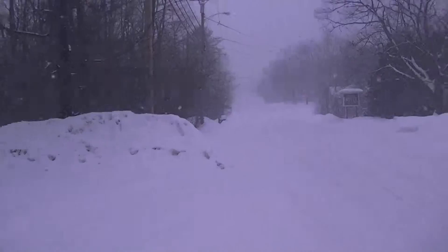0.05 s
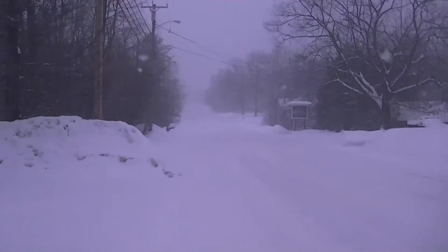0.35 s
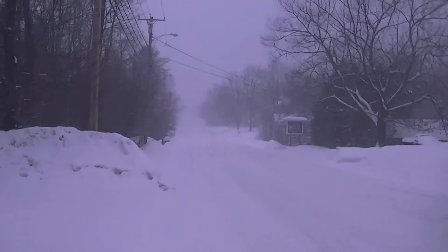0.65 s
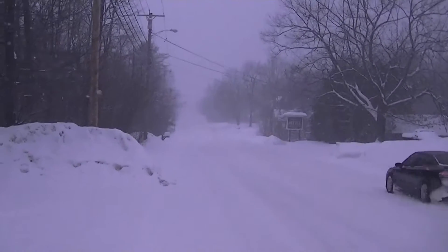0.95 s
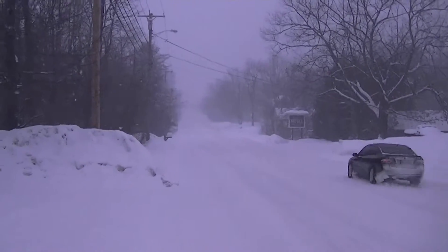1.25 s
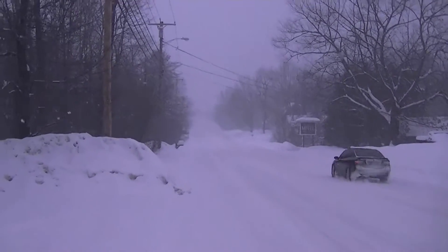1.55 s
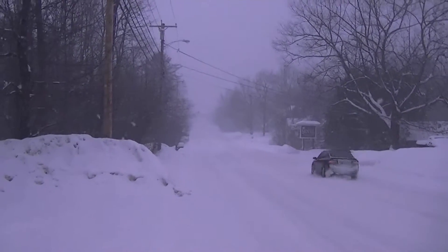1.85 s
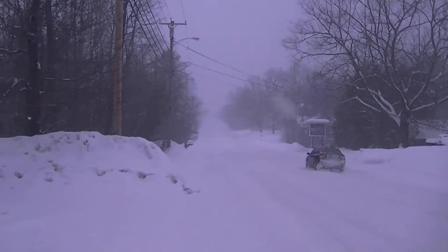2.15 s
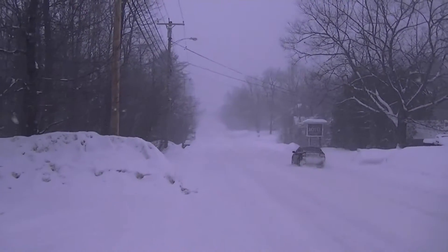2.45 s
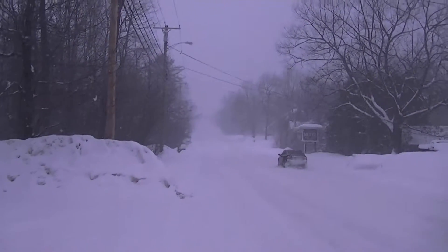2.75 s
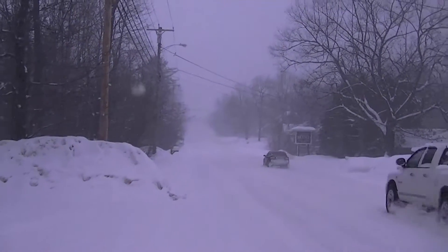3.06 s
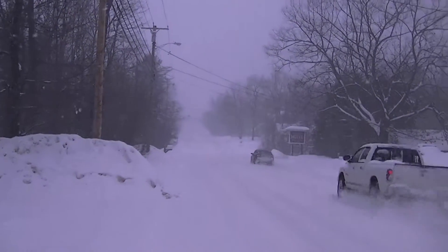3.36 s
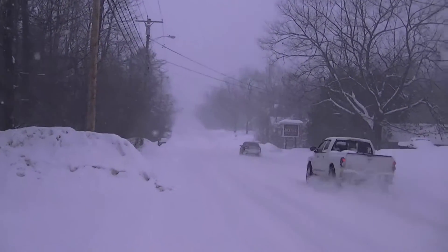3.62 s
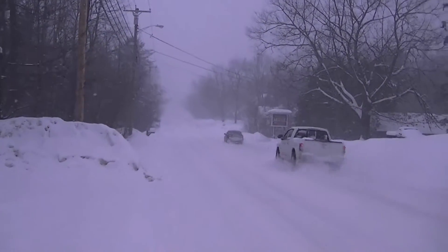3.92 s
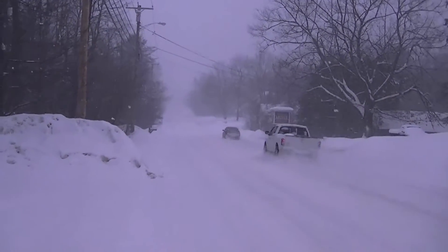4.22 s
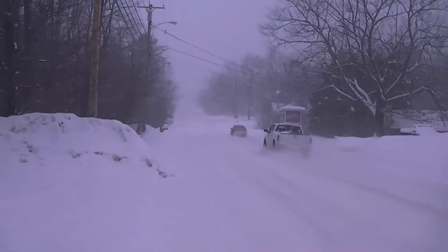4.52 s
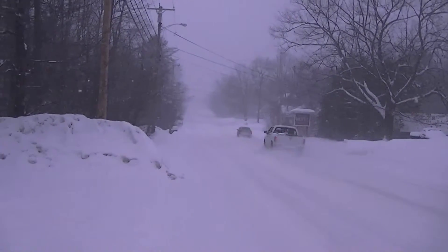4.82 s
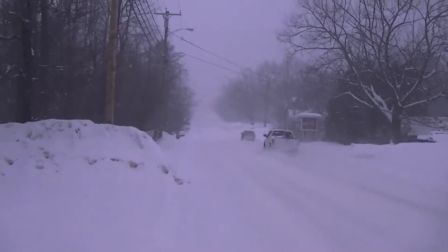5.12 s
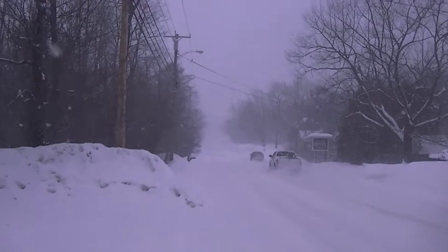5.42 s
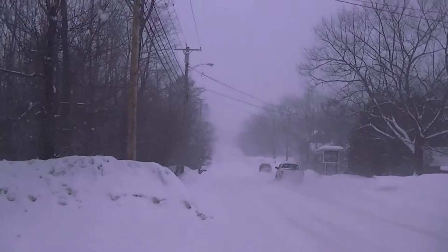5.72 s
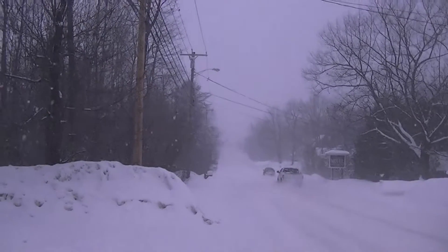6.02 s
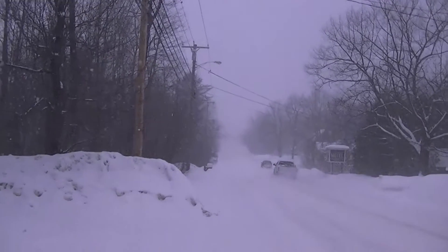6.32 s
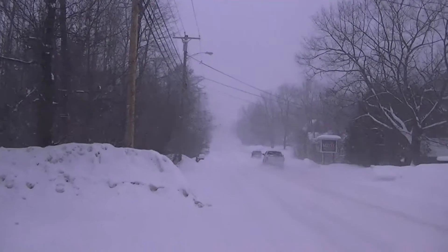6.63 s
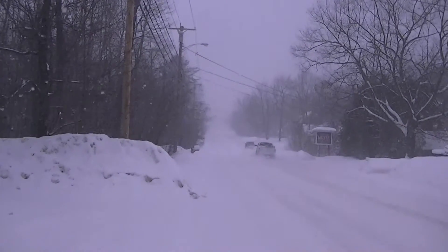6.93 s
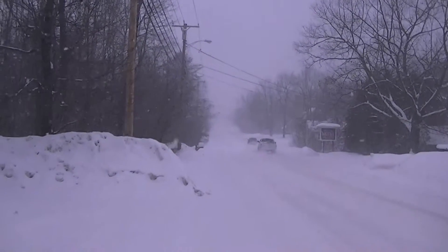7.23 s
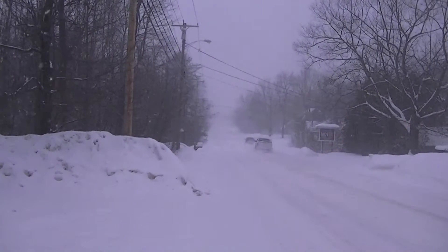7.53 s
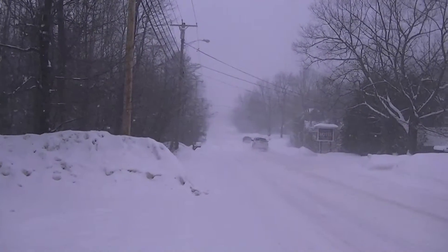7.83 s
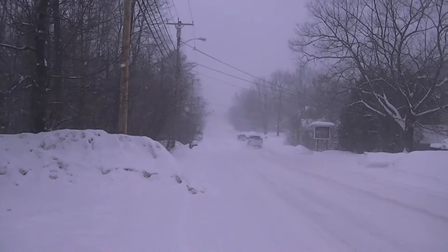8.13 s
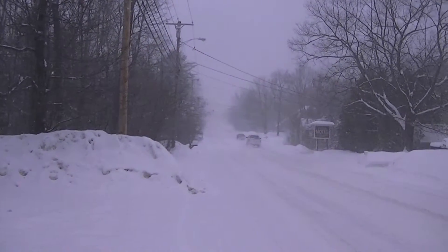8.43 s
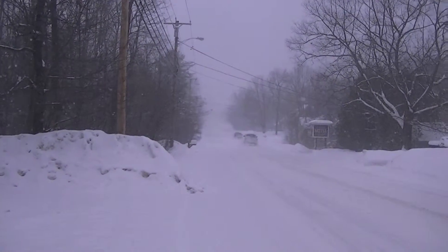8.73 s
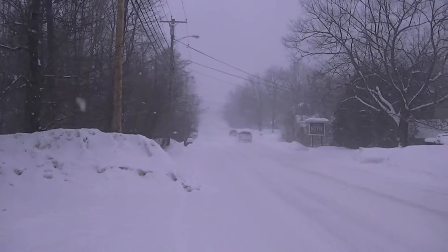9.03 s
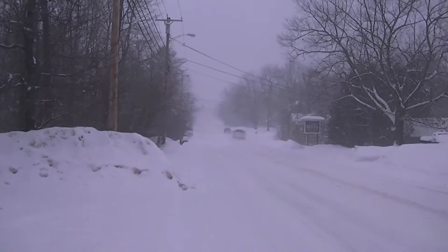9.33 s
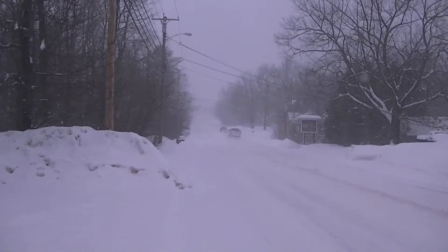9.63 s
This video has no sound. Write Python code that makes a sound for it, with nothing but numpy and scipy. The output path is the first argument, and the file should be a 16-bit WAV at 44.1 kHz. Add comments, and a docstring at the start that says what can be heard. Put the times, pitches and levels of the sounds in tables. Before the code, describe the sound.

A car is already passing on a snowy road, slightly to the right, its tyres roaring away with a hollow swish and a hiss of powder. Just before 2 seconds a heavy flake slaps the microphone sharply on the left, and a tyre knocks. A pickup passes close between 2 and 3 seconds, with a swelling tyre roar, bright spray and a throbbing engine hum that drops in pitch. From about 2.5 to 5 seconds its exhaust chirps in thin bouts, joined early on by a faint squeak of snow. The engine sags around 5 seconds, then climbs near 7 as the pickup pulls away and fades, with fainter chirps. Wind rushes in the trees throughout, gusting around 6 to 7 seconds and rising to a brief hollow howl at 9. Icy flakes tick lightly on the microphone, with heavier taps near 6 and 8 seconds.

```python
"""Two vehicles on a snowy road.

A car, then a V8 pickup, pass close by and drive off into a snowstorm. Tyres roar on packed snow
and throw up powder. The pickup's note drops as it passes, sags as it coasts and climbs as it
pulls away, while a small exhaust leak chirps in bouts. Wind gusts in the trees, and icy flakes
strike the microphone's two openings, its left and right ports."""
import sys
import numpy as np
from scipy import signal
from scipy.fft import rfft, irfft, next_fast_len
from scipy.io import wavfile

SR = 44100
rng = np.random.default_rng(int(sys.argv[2]) if len(sys.argv) > 2 else 0)


def store_pcm(level_fs):
    """Save levels as 16-bit WAV."""
    pcm = np.round(np.clip(level_fs, -1, 1) * 32767).astype(np.int16)
    wavfile.write(sys.argv[1], SR, np.atleast_2d(pcm).T)


N = 426447
T = np.arange(N) / SR

# how each vehicle drives past: closest_at_s, speed_m_per_s, closest_m
CAR_PASS = (-0.51, 9.95, 4.08)
PICKUP_PASS = (2.43, 13.5, 4)
# where the traffic is heard from: time_s, left_minus_right_db, left_lag_samples
DIRECTION = [(0, -4.5, 4.2), (.5, -3.5, 2.7), (1.1, -2, 1.2), (1.5, -3, 2), (2.1, -4, 4.5), (2.7, -4, 3),
             (3.3, -1.5, 1.6), (4.5, -0.7, 0.56), (9.6, -0.6, 0.85)]
# how each tyre sound travels (levels are sideways at 10 m, before the snow soaks any up):
# car_db, pickup_db, extra_ahead_db, extra_behind_db, snow_loss_db_per_m, beam_tightness
ROAR_TRAVEL = (-47, -44.5, 14.5, 15.5, 0.25, 2.5)
DRONE_TRAVEL = (-46, -48, 19.5, 20.5, 0.16, 4)
RUSH_TRAVEL = (-44, -45.5, 14.5, 10, 0.33, 2.5)
SPRAY_TRAVEL = (-69.5, -60.5, 16.5, 19, 0.26, 3.5)

# the tone colour of each noise, from bass to treble: pitch_hz, level_db
ROAR_COLOUR = [(25, -62), (45, -25), (80, -18.5), (150, -9.5), (280, 1), (440, 1), (660, 0), (850, -7.5),
               (1300, -24), (2500, -23)]
CAR_DRONE_COLOUR = [(170, -37), (280, -7.5), (360, -13.5), (445, -1.5), (490, -4), (540, -11), (750, -17.5)]
PICKUP_DRONE_COLOUR = [(250, -38), (370, -5.5), (430, -8), (490, -3), (560, -5.5), (800, -23)]
RUSH_COLOUR = [(350, -26), (650, 3), (900, 1.5), (1300, 0), (1750, -5), (2300, -8.5), (3000, -23.5),
               (4200, -37), (7000, -55)]
SPRAY_COLOUR = [(1500, 6), (3000, 11), (4000, 6), (5300, 2), (7500, 2), (10500, 1), (12500, -5.5),
                (15000, -8.5), (16500, -33)]
POWDER_COLOUR = [(1800, 12), (3600, 5.5), (4500, 4.5), (7500, 2), (11000, 2), (15000, -11)]
SWISH_COLOUR = [(450, -26), (750, 5.5), (1050, 2), (1280, 2.5), (1550, -2.5), (2400, -18.5)]
BURBLE_COLOUR = [(180, -28), (285, 2), (400, 10.5), (480, 0.5), (580, -12), (800, -3), (1200, -25)]
LOOSE_SNOW_COLOUR = [(700, -16), (1400, 5.5), (1750, 1), (2200, 1), (3000, -5), (4000, -13.5), (6000, -23),
                     (12000, -35)]
# how alike left and right are (1 = the same), for most noises and for close ones: pitch_hz, likeness
USUAL_LIKENESS = [(100, 0.63), (250, 0.87), (500, 1), (1000, 0.71), (1500, 0.47), (2100, 0.59), (5000, 0.2),
                  (12000, 0.26)]
CLOSE_LIKENESS = [(8000, 0.88), (13000, 0.55)]
# the two ports ring differently: pitch_hz, left_minus_right_db
PORT_BALANCE = [(1350, -0.5), (1700, 3.5), (2200, 0), (3600, -2), (5000, 0), (10300, 5), (12700, -5),
                (16000, -3)]

# each vehicle flings powder at the microphone: start_s, length_s, level_db
POWDER_FLINGS = [(-0.1, 0.55, -50), (1.953, 0.99, -48.5)]
# a tyre knocks; the tyre roar swells broadly around that moment: time_s, knock_db, swell_db
TYRE_KNOCKS = [(1.995, -23, 6), (3.516, -29, 1.5), (4.693, -34, 3)]
# a tyre ploughs through loose snow: start_s, length_s, level_db, rise_s
LOOSE_SNOW_PATCHES = [(2.554, 0.37, -50, 0.3), (4.127, 0.18, -42.5, 0.059)]
# gusts of wind: peak_s, half_length_s, extra_db
GUSTS = [(5.85, 0.19, 3.5), (6.356, 0.26, 3.5), (6.936, 0.27, 2), (8.997, 0.5, 4)]
# a hollow swish: peak_s, half_length_s, level_db
SWISHES = [(0.353, 0.48, -33.5)]
# the wind howls: peak_s, rise_s, level_db
HOWLS = [(6.89, 0.11, -54), (9.0, 0.25, -46)]

# engine speed (in one cycle all eight cylinders fire once): time_s, cycles_per_s
ENGINE_SPEED = [(0, 13.26), (1.4, 13.58), (4.1, 13.52), (4.7, 13.59), (5.0, 12.79), (5.25, 12.17),
                (5.6, 12.1), (6.05, 12.48), (6.6, 13.56), (7.2, 14.82), (8.0, 14.99), (9.1, 15.04),
                (9.67, 14.8)]
COAST_PER_S, CRUISE_PER_S, PULL_PER_S = 12.1, 13.55, 14.9
# the whole engine hum grows louder and softer: time_s, gain_db
HUM_LOUDNESS = [(0, -4), (.6, -2), (1.5, -1.5), (1.88, 1), (2.2, 2.5), (2.6, -1.5), (3.1, 1.5), (4.7, -1.5),
                (5.9, -3), (6.55, -5), (7.3, -2.1), (9.0, -4.5), (9.67, -6)]
# the main engine tones; a tone's order is how many times it vibrates in one cycle:
# order, coasting_db, cruising_db, pulling_db, extra_approaching_db, extra_passing_db
FIRING_TONES = [(8, -80, -46.5, -49, 1.5, -3), (12, -60, -48, -42, 2.5, 10.5),
                (16, -41.5, -56.5, -89, -4, 20), (20, -53, -51.5, -53, 3.5, 14.5)]
# the eight exhaust pulses in firing order, used to set each tone's phase: strength
PULSE_STRENGTHS = [0.907, 0.27, 0.612, 0.768, 0.31, 0.821, 0.628, 0.34]
# the tones of the lope, the throb of uneven firing: order
LOPE_ORDERS = (4, 5, 7, 9, 10, 13, 14, 15, 17, 18, 19, 21, 22, 25, 26, 27, 28, 29, 32, 33)
# the share of each of those tones when cruising and when pulling: relative_db
LOPE_CRUISING_DB = (-22, -22, -7.5, -11.5, -11, 3.5, 0.5, 0, -10, -29, -0.5, -20, -6, -9.5, -13, -18, -19,
                    -3, -35, -11)
LOPE_PULLING_DB = (-25, -20, -6, -0.5, -1.5, -2, 1.5, -1, 4.5, -12, -14, -20, -7, -3.5, -6, -9, -2, -6.5,
                   -8, -4)
# base levels of the lope and of the tailpipe's burble: coasting_db, cruising_db, pulling_db
LOPE_DB = (-66, -50, -53.5)
BURBLE_DB = (-51.5, -52.5, -44)
# bouts of chirping from the exhaust leak: start_s, length_s, level_db, start_pitch_hz
LEAK_CHIRPS = [(2.449, 0.12, -42, 2800), (2.591, 0.26, -41, 2600), (2.949, 0.172, -46.5, 2550),
               (3.121, 0.15, -41.3, 2400), (3.291, 0.36, -43, 2700), (3.67, 0.24, -44.5, 2550),
               (3.965, 0.22, -48.5, 2950), (4.37, .36, -50, 2500), (4.728, 0.21, -54.5, 2550),
               (6.488, 0.023, -54, 2950), (6.779, 0.063, -54.5, 2850), (6.931, .4, -59.5, 3000),
               (7.37, 0.121, -56.5, 3000), (7.615, 0.053, -54.5, 2600), (7.758, .16, -57, 2600),
               (8.032, 0.66, -60.5, 2900), (8.655, 0.86, -58, 2350), (9.16, .03, -53, 2450),
               (9.267, 0.118, -52.5, 2284)]

# heavy flakes slap a port: time_s, slap_db, left_minus_right_db, thud_db
HEAVY_FLAKES = [(1.9348, -4.5, 31, -25), (6.1633, -33, -24, -26), (6.1632, -13, -22, -30),
                (7.9657, -21, -20, -26), (7.967, -24, -16, -31)]
# icy flakes shatter on a port: time_s, strike_db, left_minus_right_db, pitch_hz
ICY_FLAKES = [(3.1787, -35, 0.5, 11500), (3.5887, -35, 7, 10500), (3.8137, -32, -4, 12800),
              (5.1637, -35, 5, 12000), (5.3483, -31.5, 3, 9650), (5.5243, -36, 2, 9800),
              (6.3843, -30, -2, 10500), (6.511, -38, 1.5, 11080), (6.565, -34.5, -0.5, 9000),
              (6.895, -35, -12, 12430), (7.161, -34, 3, 9530), (7.7628, -35, 0.5, 11600),
              (9.0458, -37, 9, 10470), (9.1064, -27, 3, 12500)]


def from_db(db):
    """Turn decibels into a gain to multiply a sound by."""
    return 10 ** (np.asarray(db) / 20)


def rms_one(x):
    """Scale a signal so that its average power is 1."""
    return x / np.sqrt(np.mean(x ** 2) + 1e-20)


def in_time(rows):
    """Join a table's points with lines, giving each column a value at every sample."""
    times, *columns = np.transpose(rows)
    return [np.interp(T, times, column) for column in columns]


def per_bin(points):
    """Read a table of pitches at every frequency of the spectrum."""
    hz, value = np.transpose(points)
    return np.interp(np.log(np.arange(N // 2 + 1) * SR / N + 1), np.log(hz), value)


def drift(rate_hz):
    """A smooth random wobble, about 1 in size."""
    keep = np.exp(-80 * np.pi * rate_hz / SR)
    steps = rng.standard_normal(N // 40 + 2002)  # one for every 40 samples
    slow = signal.lfilter([1], [1, -2 * keep, keep * keep], steps)[2000:]
    return np.interp(np.arange(N) / 40, np.arange(len(slow)), rms_one(slow))


def swell(peak_s, half_length_s):
    """A smooth rise and fall, 1 at its peak."""
    return np.exp(-((T - peak_s) / half_length_s) ** 2)


def bout(start_s, length_s, db, rise_s, fade_s):
    """The loudness of one event: it rises, holds and fades."""
    since = np.maximum(T - start_s, 0)
    return from_db(db) * np.minimum(since / rise_s, 1) * np.exp(-np.maximum(since - length_s, 0) / fade_s)


def resonance(x, hz, width_hz):
    """Make a sound ring around one pitch; a narrower width rings longer."""
    keep = np.exp(-np.pi * width_hz / SR)
    feedback = [1, -2 * keep * np.cos(2 * np.pi * hz / SR), keep * keep]
    return signal.lfilter(np.array([1, 0, -1]) * (1 - keep * keep) / 2, feedback, x + 1e-18)


def noise(colour, likeness=USUAL_LIKENESS):
    """Stereo noise with a given tone colour, partly alike on the left and right."""
    shared, opposite = rfft(rng.standard_normal((2, N)))
    alike = np.clip(per_bin(likeness), -1, 1)
    pair = np.sqrt(1 + alike) * shared + np.sqrt(1 - alike) * opposite * [[1], [-1]]
    top_hz, top_db = colour[-1]
    faded_top = list(colour) + [(2 * top_hz, top_db - 40)]
    return rms_one(irfft(pair * from_db(per_bin(faded_top)), N))


def position(vehicle):
    """Distance in metres, and heading from -1 (coming straight on) to 1 (going straight away)."""
    closest_at_s, speed, closest_m = vehicle
    along = speed * (T - closest_at_s)
    distance = np.hypot(along, closest_m)
    return distance, along / distance


def carried(vehicle, db, ahead_db, behind_db, loss_db_per_m, tightness):
    """How much tyre sound arrives: it spreads out, beams along the road and is soaked up by snow."""
    distance, heading = position(vehicle)
    beam_db = np.where(heading < 0, ahead_db, behind_db) * np.abs(heading) ** tightness
    return from_db(db + beam_db - loss_db_per_m * distance) * 10 / distance


def passing(travel):
    """The loudness of a tyre sound that both vehicles make."""
    car_db, pickup_db, *beam = travel
    return np.hypot(carried(CAR_PASS, car_db, *beam), carried(PICKUP_PASS, pickup_db, *beam))


def drone():
    """The car's treads drone in a narrow, hollow band, the pickup's in a broader one."""
    car_db, pickup_db, *beam = DRONE_TRAVEL
    car = carried(CAR_PASS, car_db, *beam) * noise(CAR_DRONE_COLOUR)
    pickup = carried(PICKUP_PASS, pickup_db, *beam) * noise(PICKUP_DRONE_COLOUR)
    return car + pickup


def tyres(roar_flutter_db=0.97, rush_flutter_db=1.0):
    """Treads pack the snow with a roar that swells now and then; air rushes out and powder sprays."""
    swell_db = sum(db * swell(s, half_length_s=0.46) for s, _, db in TYRE_KNOCKS)
    tread = from_db(swell_db) * passing(ROAR_TRAVEL) * noise(ROAR_COLOUR) + drone()
    roar = from_db(roar_flutter_db * drift(4.3)) * tread
    rush = passing(RUSH_TRAVEL) * from_db(rush_flutter_db * drift(30)) * noise(RUSH_COLOUR)
    spray = passing(SPRAY_TRAVEL) * noise(SPRAY_COLOUR)
    return roar + rush + spray


def powder(flutter_db=1.34):
    """Flung powder hisses brightly from one close spot, then fades."""
    gain = sum(bout(*row, rise_s=0.041, fade_s=0.36) for row in POWDER_FLINGS)
    return gain * from_db(flutter_db * drift(21)) * noise(POWDER_COLOUR, CLOSE_LIKENESS)


def wind(rush_db=-51.5, hiss_db=-60.5, flutter_db=0.88, hiss_follows=0.32):
    """The storm rushes in the bare trees; blown snow hisses and follows the gusts a little."""
    gust_db = sum(db * swell(s, half_s) for s, half_s, db in GUSTS) + flutter_db * drift(17)
    rush = from_db(rush_db + gust_db) * noise(RUSH_COLOUR)
    hiss = from_db(hiss_db + hiss_follows * gust_db) * noise(SPRAY_COLOUR)
    return rush + hiss


def swish():
    """A hollow swish rises and falls."""
    return sum(from_db(db) * swell(s, half_s) for s, half_s, db in SWISHES) * noise(SWISH_COLOUR)


def by_load(coasting, cruising, pulling):
    """Blend three values as the engine slows down and speeds up."""
    speed, = in_time(ENGINE_SPEED)
    return np.interp(speed, [COAST_PER_S, CRUISE_PER_S, PULL_PER_S], [coasting, cruising, pulling])


def engine_hum(cycles, stumble_cycles=0.0017, rough_db_per_order=0.0815, lope_waver_db=1.0):
    """Exhaust pulses blend into a hum, which throbs as they are unequal and never quite on time."""
    distance, heading = position(PICKUP_PASS)
    approaching = np.maximum(-heading, 0)
    going_past = bout(start_s=1.96, length_s=0.755, db=0, rise_s=0.34, fade_s=0.32)
    pull = by_load(0, 0, 0.96)
    uneven_cycles = cycles + stumble_cycles * drift(23)
    far_lift_db = 0.05 * np.maximum(distance - 60, 0)
    pulse_places = np.arange(len(PULSE_STRENGTHS)) / len(PULSE_STRENGTHS)

    def tone(order, db):
        """One engine tone; high ones are rougher, gain a little far off and leave the pipe later."""
        pulses = np.sum(PULSE_STRENGTHS * np.exp(-2j * np.pi * order * pulse_places))
        pipe_lag = 0.0115 * order * order
        phase = 2 * np.pi * order * uneven_cycles + np.angle(pulses) - pipe_lag
        db = db + rough_db_per_order * order * drift(13) + (far_lift_db if order > 20 else 0)
        return np.sqrt(2) * from_db(db) * np.cos(phase)

    firing = sum(by_load(*from_db(load_db)) * tone(order, ahead_db * approaching + past_db * going_past)
                 for order, *load_db, ahead_db, past_db in FIRING_TONES)
    lope = sum(tone(order, cruising + pull * (pulling - cruising) + lope_waver_db * drift(1.9))
               for order, cruising, pulling in zip(LOPE_ORDERS, LOPE_CRUISING_DB, LOPE_PULLING_DB))
    tailpipe_in_view_db = 5 * swell(peak_s=2.82, half_length_s=0.69)
    lope = lope * by_load(*from_db(LOPE_DB)) * from_db(tailpipe_in_view_db)
    hum = from_db(in_time(HUM_LOUDNESS)[0]) * (firing + lope)
    # the hum reaches the left port a little later and weaker
    sides = np.array([[-1], [1]])
    shifted = signal.hilbert(hum, next_fast_len(N))[:N] * np.exp(0.11j * sides)
    return np.real(shifted) * from_db(0.3 * sides)


def burble(cycles, loss_db_per_m=0.6):
    """Rough gas puffs from the tailpipe, hardest when pulling; past 60 m the snow soaks it up."""
    puffs = np.exp(0.059 * np.cos(2 * np.pi * cycles) + 0.5 * np.cos(2 * np.pi * 4 * cycles))
    beyond_m = np.maximum(position(PICKUP_PASS)[0] - 60, 0)
    gain = by_load(*from_db(BURBLE_DB)) * from_db(-loss_db_per_m * beyond_m)
    return gain * rms_one(puffs) * noise(BURBLE_COLOUR)


def fine_snow(per_s=11, strike_db=-51, spread_db=4, crumble_s=0.0022):
    """Small flakes patter on each port at random and crumble."""
    lands = rng.random((2, N)) < per_s / SR
    hits = lands * from_db(strike_db + spread_db * np.clip(rng.standard_normal(N), -2, 2))
    fades = signal.lfilter([1], [1, -np.exp(-1 / (crumble_s * SR))], hits + 1e-18)
    ticks = fades * rng.standard_normal((2, N))
    return signal.sosfilt(signal.butter(2, [8500, 14500], "band", fs=SR, output="sos"), ticks)


def heavy_flakes(spike_s=0.000027, crumbs=0.1, scatter_s=0.001):
    """A heavy flake slaps one port and crumbles, with a short low thud, opposite on left and right."""
    out, t = np.zeros((2, N)), T[:SR // 100]
    port = signal.butter(1, [900, 13500], "band", fs=SR, output="sos")
    for s, db, pan_db, thud_db in HEAVY_FLAKES:
        slap = np.exp(-t / spike_s) + crumbs * rng.standard_normal((2, len(t))) * np.exp(-t / scatter_s)
        sides = from_db([[pan_db / 2], [-pan_db / 2]])
        at = int(s * SR)
        out[:, at:at + len(t)] += from_db(db) * signal.sosfilt(port, slap) * sides / sides.max()
        out += knocks([(s, thud_db)], hz=557, width_hz=310) * np.sign(pan_db) * np.array([[1], [-1]])
    return out


def knocks(events, hz, width_hz):
    """Soft blows, each given as time_s and level_db, ring briefly at one pitch."""
    hits = np.zeros(N)
    for s, db, *_ in events:
        hits[int(s * SR)] = from_db(db)
    return resonance(resonance(hits, hz, width_hz), hz, 2 * width_hz) * SR / (np.pi * width_hz)


def exhaust_leak(cycles, trim_db=-0.5, uneven_db=1.1, end_hz=2100, width_hz=215, seep=0.021, pure=0.69):
    """One bank of four cylinders spits gas; each spit whistles and falls as its cylinder empties."""
    spit, progress = np.divmod(cycles * 4, 1)  # progress runs from 0 to 1 in each spit
    chance = np.clip(rng.standard_normal((int(spit[-1]) + 1, 3)), -2, 2)
    size, sharpness, detune = chance[spit.astype(int)].T
    flow = from_db(uneven_db * size) * (seep + progress * np.exp(-progress / 0.16))
    start_hz, = in_time([(s + length / 2, hz) for s, length, _, hz in LEAK_CHIRPS])
    fall = np.exp(-progress / 0.23 + 0.2 * sharpness)
    hz = (end_hz + (start_hz - end_hz) * fall) * (1 + 0.02 * detune)
    roughness = noise([(10, 0), (width_hz, -5), (4 * width_hz, -27)])
    roughness += 0.7 * noise([(10, 0), (width_hz, -5)]) * [[1], [-1]]
    phase = 2 * np.pi * np.cumsum(hz) / SR
    tones = np.sin(phase) + from_db(-14) * np.sin(1.5 * phase)
    whistle = rms_one(flow * (pure + roughness) * tones)
    bouts = [bout(s, length, db, rise_s=0.006, fade_s=0.076) for s, length, db, _ in LEAK_CHIRPS]
    return from_db(trim_db) * np.max(bouts, axis=0) * whistle


def loose_snow():
    """A tyre ploughs through loose snow with a short hiss."""
    return sum(bout(*row, fade_s=0.099) for row in LOOSE_SNOW_PATCHES) * noise(LOOSE_SNOW_COLOUR)


def squeak(start_s=2.66, length_s=0.98, level_db=-55, start_hz=3850, fall_hz_per_s=460, width_hz=140):
    """Cold snow squeaks fitfully under the pickup's tyres: a thin, rough whistle that sinks a little."""
    hz = start_hz - fall_hz_per_s * np.clip(T - start_s, 0, length_s)
    gain = bout(start_s, length_s, level_db, rise_s=0.015, fade_s=0.05) * from_db(3 * drift(14))
    return gain * noise([(10, 0), (width_hz, -5)]) * np.sin(2 * np.pi * np.cumsum(hz) / SR)


def icy_flakes(boost_db=4, scatter_s=0.002, crumbs=0.52, width_hz=3200):
    """Each icy flake shatters on one port with a thin tick at a pitch of its own."""
    out, t = np.zeros((2, N)), T[:SR // 100]
    for s, db, pan_db, hz in ICY_FLAKES:
        tick = crumbs * rng.standard_normal((2, len(t))) * np.exp(-t / scatter_s)
        tick[int(pan_db < 0), 0] += 1  # a sharp click on the port that is hit
        sides = from_db([[pan_db / 2], [-pan_db / 2]])
        at = int(s * SR)
        ring = resonance(tick, hz, width_hz)
        out[:, at:at + len(t)] += from_db(db + boost_db) * ring * sides / sides.mean()
    return out


def howl(hz=1270, width_hz=340, fall_s=0.14):
    """Gusts build ever faster to a hollow howl that dies quickly."""
    gain = sum(from_db(db) * np.exp(-np.maximum((s - T) / rise_s, (T - s) / fall_s))
               for s, rise_s, db in HOWLS)
    return gain * rms_one(resonance(noise(RUSH_COLOUR), hz, width_hz))


def from_road(pair, widen=2.95, widen_below_hz=1900):
    """Sound from the right reaches the left port later and weaker; the small difference is widened."""
    pan_db, lag = in_time(DIRECTION)
    left = np.interp(np.arange(N) - lag, np.arange(N), pair[0])
    wide = widen / 2 * signal.filtfilt(*signal.butter(1, widen_below_hz, fs=SR), left - pair[0])
    return np.array([(left + wide) * from_db(pan_db / 2), (pair[1] - wide) * from_db(-pan_db / 2)])


def ports(pair):
    """Each port colours the sound from outside in its own way."""
    return irfft(rfft(pair) * from_db(per_bin(PORT_BALANCE) / 2 * [[1], [-1]]), N)


def scene(sound_m_per_s=343):
    """Traffic on the road, wind in the trees, snow on the microphone."""
    away_m_per_s = PICKUP_PASS[1] * position(PICKUP_PASS)[1]
    doppler = 1 / (1 + away_m_per_s / sound_m_per_s)  # higher pitch coming, lower going
    cycles = np.cumsum(in_time(ENGINE_SPEED)[0] * doppler) / SR
    wheels = tyres() + loose_snow() + powder() + squeak() + knocks(TYRE_KNOCKS, hz=695, width_hz=300)
    road = from_road(wheels + wind() + howl() + swish() + exhaust_leak(cycles) + burble(cycles))
    return ports(road + heavy_flakes()) + engine_hum(cycles) + icy_flakes() + fine_snow()


def record(dry, low_hz=42, top_hz=16000):
    """The microphone thins the deepest bass; the highest treble is cut steeply."""
    thinned = signal.sosfilt(signal.butter(4, low_hz, "high", fs=SR, output="sos"), dry)
    return signal.sosfilt(signal.ellip(10, .1, 80, top_hz, fs=SR, output="sos"), thinned)


dry = scene()
out = record(dry)
store_pcm(out)
```